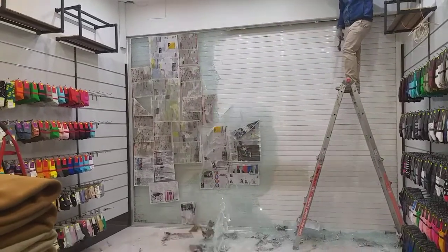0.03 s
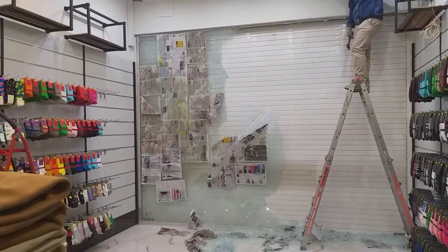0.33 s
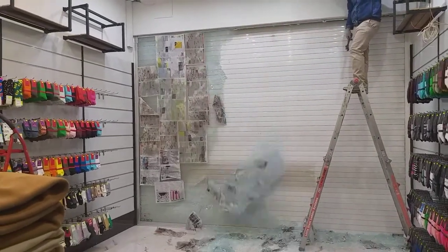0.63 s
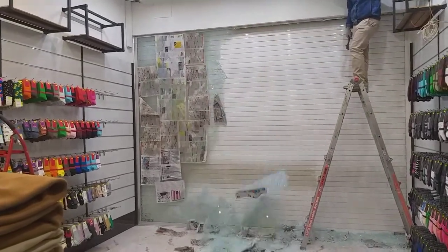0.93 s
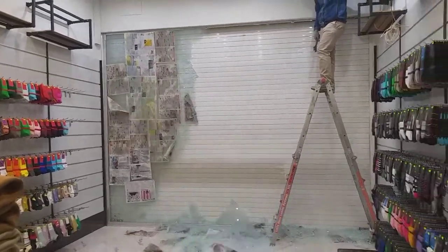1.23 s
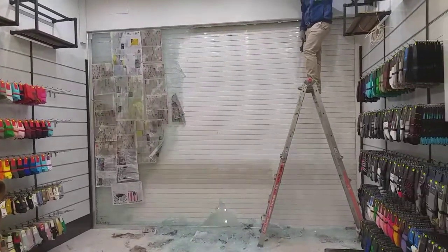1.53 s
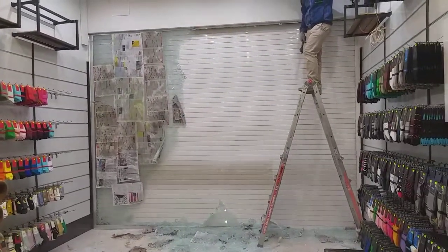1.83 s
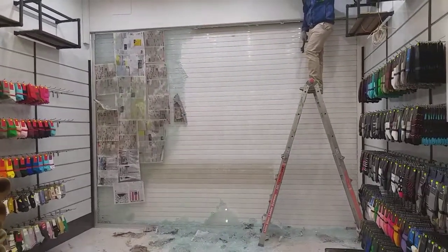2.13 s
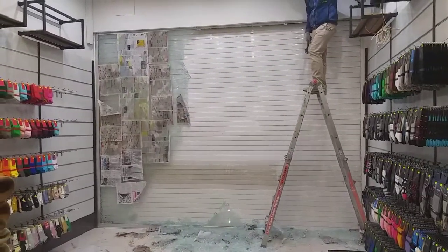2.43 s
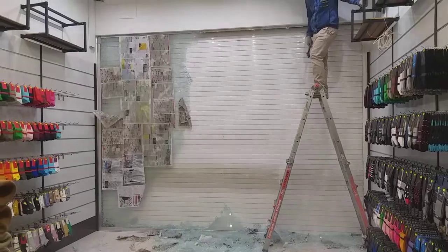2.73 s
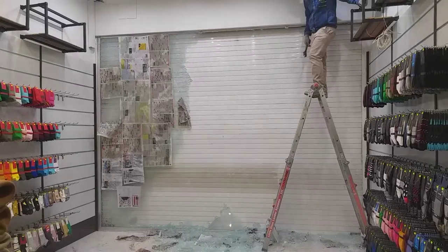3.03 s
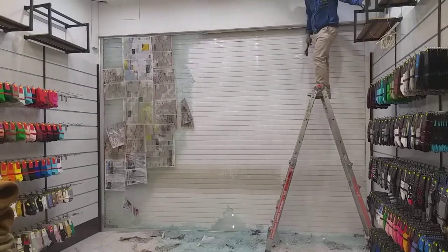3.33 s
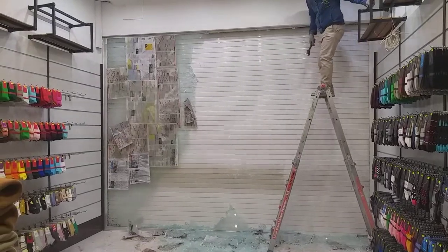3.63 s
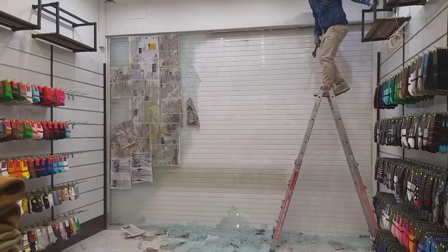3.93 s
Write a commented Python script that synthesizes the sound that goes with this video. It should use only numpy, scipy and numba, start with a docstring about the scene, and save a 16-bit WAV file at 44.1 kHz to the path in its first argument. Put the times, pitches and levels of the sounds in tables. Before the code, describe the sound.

A large glass pane collapses onto a hard shop floor a few metres away, with thuds and a dense shower of ringing fragments. The shower thins to single clinks, then the remaining glass crackles faintly in the slightly echoing room.

```python
"""A toughened glass pane collapses onto the hard floor of a small shop, a few metres away.
Slabs thud and burst into thousands of clicking, ringing crumbs; the shower thins and single pieces land.
Glass and paper slide down the frame with a swish. The crazed glass left in it crackles and drops
a few more bits. Each landing place has its own echoes; a low room rumble lies underneath."""
import sys
import numpy as np
from scipy import signal
from scipy.fft import rfft, irfft
from scipy.io import wavfile
from scipy.ndimage import uniform_filter1d
from numba import njit

SR = 44100
rng = np.random.default_rng(int(sys.argv[2]) if len(sys.argv) > 2 else 0)


def generate_wav(signal):
    """Clip the signal to [-1, 1] and save it as 16-bit WAV at the path in sys.argv[1]."""
    frames = np.transpose(np.atleast_2d(signal))
    scaled = np.clip(frames, -1, 1) * 32767
    pcm = np.round(scaled).astype(np.int16)
    wavfile.write(sys.argv[1], SR, pcm)


N = 4 * SR

BODY_HZ, RING_HZ, BRIGHT_HZ, SPLINTER_HZ, TOP_HZ = 514, 3240, 6300, 10000, 15900  # band edges of a hit
TAIL_DB, EARLY_DB = -11.5, -10


def undb(db):
    """Decibels to gain."""
    return 10 ** (np.asarray(db) / 20)


def unit(x):
    """Scale to rms 1."""
    return x / np.sqrt(np.mean(x ** 2) + 1e-20)


def even(x):
    """Hold the slow level of a stream at 1, leaving its grain."""
    return x / np.sqrt(np.abs(uniform_filter1d(x ** 2, size=2600)) + np.mean(x ** 2) / 1000)


def curve(rows, column=1):
    """One column of a table, interpolated linearly in time."""
    rows = np.array(rows)
    return np.interp(np.arange(N) / SR, rows[:, 0], rows[:, column])


def along(points, hz):
    """Read (Hz, value) points on a log-frequency axis."""
    points = np.array(points)
    return np.interp(np.log(hz + 1), np.log(points[:, 0]), points[:, 1])


def band(hz, low_hz, high_hz, order=6):
    """Band-pass gain; order sets the slope of the lower edge."""
    return ((1 + (low_hz / (hz + 1)) ** (2 * order)) * (1 + (hz / high_hz) ** 12)) ** -.5


def resonance(hz, centre_hz, width_hz):
    """Gain of one resonance, 1 at its centre."""
    return (1 + ((hz - centre_hz ** 2 / (hz + 1)) / width_hz) ** 2) ** -.5


def shape(x, gain, size=4096):
    """Minimum-phase filter with response gain(hz)."""
    cepstrum = irfft(np.log(gain(np.arange(size // 2 + 1) * SR / size) + 1e-5))
    cepstrum[1:size // 2] *= 2
    cepstrum[size // 2 + 1:] = 0
    return signal.fftconvolve(x, irfft(np.exp(rfft(cepstrum))))[:len(x)]


def equalise(x, points):
    """Filter by (Hz, dB) points."""
    return shape(x, lambda hz: undb(along(points, hz)))


def add(out, start_s, x):
    """Mix a sound in at its time."""
    i = int(start_s * SR)
    out[i:i + len(x)] += x[:N - i]


@njit
def ring(n, starts, sizes, hz, t60_s):
    """Each impact rings one decaying mode, with the energy of its click."""
    out = np.zeros(n)
    for k in range(len(starts)):
        fade = np.log(1000) / (t60_s[k] * SR)
        pole = np.exp(2j * np.pi * hz[k] / SR - fade)
        phasor = sizes[k] * 2 * np.sqrt(fade) + 0j
        for i in range(starts[k], min(n, starts[k] + int(t60_s[k] * SR))):
            phasor *= pole
            out[i] += phasor.imag
    return out


def impacts(per_s, force, low_hz=RING_HZ, high_hz=TOP_HZ, ring_share=0, t60_s=.026, spread_db=1.5):
    """Random impacts of very unequal size: clicks, with a share of ringing at each shard's own pitch."""
    n = len(force)
    chance, size, pitch, damping, sign = rng.random((5, n))
    at = np.flatnonzero(chance < per_s / SR)
    size_db = -spread_db * np.log(.016 + size[at])  # offset bounds the largest impacts
    clicks = np.zeros(n)
    clicks[at] = force[at] * np.sign(sign[at] - .5) * undb(size_db)
    pitch_hz = low_hz + (high_hz - low_hz) * pitch[at]
    rings = ring(n, at, clicks[at], pitch_hz, t60_s * 2 ** (3 * (damping[at] - .5)))
    return np.sqrt(1 - ring_share) * clicks + np.sqrt(ring_share) * rings


def rumble():
    """Low background noise of the building."""
    # Each row: frequency in Hz, relative density in dB.
    spectrum = [(25, 1.5), (60, 2), (130, 0), (200, -6.5), (350, -13.5), (800, -20.5), (2000, -28.5),
                (15000, -42)]
    # Each row: time in seconds, level in dB.
    levels = [(0, -46.5), (2.3, -73), (2.6, -68), (3.0, -60), (4.0, -59.5)]
    return unit(equalise(rng.standard_normal(N), spectrum)) * undb(curve(levels))


def room(x):
    """Sparse echoes off floor and shutter, then a diffuse tail that lasts longest in the midrange."""
    # Each row: frequency in Hz, reverberation t60 in seconds.
    decay = [(150, 0.16), (600, 0.79), (2000, 0.75), (6000, 0.4), (14000, 0.27)]
    t = np.arange(SR // 2) / SR
    noise = rfft(rng.standard_normal(len(t)))
    hz = np.arange(len(noise)) * SR / len(t)
    edges_hz = np.append(0, SR / 2 / 2. ** np.arange(7)[::-1])
    tail = np.zeros(len(t))
    for low_hz, high_hz in zip(edges_hz, edges_hz[1:]):
        octave = irfft(noise * (hz >= low_hz) * (hz < high_hz), len(t))
        tail += octave * undb(-60 * t / along(decay, (low_hz + high_hz) / 2))
    early = rng.standard_normal(len(t)) * (rng.random(len(t)) < 2000 / SR)
    early *= np.exp(-t / .014) * (t > .001)
    response = undb(TAIL_DB) * unit(tail * (t > .0039)) + undb(EARLY_DB) * unit(early)
    return signal.fftconvolve(x, response / np.sqrt(len(t)))[:N]


def scattered(x, places=8, hop_s=.004):
    """Glass lands all over the floor; each place has its own echoes."""
    hop = int(hop_s * SR)
    place = np.repeat(rng.integers(0, places, N // hop + 1), hop)[:N]
    shares = [np.abs(uniform_filter1d(1. * (place == k), hop)) for k in range(places)]
    return [room(x * np.sqrt(share)) for share in shares]


def width(x):
    """Left and right differ a little in two narrow ranges, and the treble widens briefly."""
    # Each row: frequency in Hz, side gain in dB.
    side_colour = [(100, -60.5), (1300, -57), (2000, -15.5), (2700, -58.5), (6000, -69.5), (8500, -31),
                   (10000, -15.5), (11500, -51), (16000, -60.5)]
    # Each row: centre and half length in seconds, low and high edge in Hz, gain in dB.
    widenings = [(0.845, 0.019, 7250, 16000, -4.5), (0.917, 0.015, 6300, 8230, -12.5)]
    t = np.arange(N) / SR
    side = equalise(x, side_colour)
    for centre_s, half_s, low_hz, high_hz, db in widenings:
        window = np.exp(-((t - centre_s) / half_s) ** 4)
        side += undb(db) * window * shape(x, lambda hz: band(hz, low_hz, high_hz))
    return side


def trickle():
    """Tiny crumbs slide and tick between the larger events."""
    # Each row: time in seconds, level in dB.
    levels = [(2.0, -79), (2.34, -50.5), (2.62, -60.5), (2.77, -53.5), (2.83, -63), (2.92, -43), (3.0, -49),
              (3.3, -51.5), (3.41, -54), (3.49, -46), (3.55, -53.5), (3.67, -47.5), (3.75, -55),
              (3.87, -51), (4.0, -59)]
    # Each row: frequency in Hz, relative gain in dB.
    colour = [(400, -26), (1000, -16), (2000, -17), (2700, -15), (3400, -2), (6000, 0), (8200, 6.5),
              (9900, -7.5), (12500, -4), (16000, -7)]
    grains = impacts(per_s=3000, force=np.ones(N), ring_share=.24, t60_s=.014)
    return even(equalise(grains, colour)) * undb(curve(levels))


def swish(width_hz=1200, upper_hz=14000):
    """Glass and paper slip down the frame: a bright resonance rises with speed, a fainter one above."""
    # Each row: time in seconds, level in dB, rub pitch in Hz.
    slide = [(2.26, -82, 5980), (2.36, -52, 7090), (2.45, -44.5, 8220), (2.55, -80, 8400)]
    slips = impacts(per_s=3000, force=np.ones(N))
    carrier = np.cos(2 * np.pi * np.cumsum(curve(slide, column=2)) / SR)
    rub = shape(slips, lambda hz: 1 / (1 + (hz / width_hz) ** 2)) * carrier
    upper = shape(slips, lambda hz: resonance(hz, upper_hz, 2 * width_hz) ** 2)
    return (even(rub) + undb(-9) * even(upper)) * undb(curve(slide))


def knocks(blur_hz=35):
    """A large piece knocks and rocks; chatter on the floor widens its low bending modes."""
    # Each row: start in seconds, level in dB.
    contacts = [(1.891, -45), (1.944, -53.5)]
    # Each row: frequency in Hz, relative level in dB, t60 in seconds.
    modes = [(506, -1, 0.29), (750, -6, .16), (976, -1, .25), (1520, -5, 0.23)]
    out, t = np.zeros(N), np.arange(SR // 2) / SR
    for start_s, db in contacts:
        for hz, mode_db, t60_s in modes:
            chatter = np.cumsum(rng.standard_normal(len(t))) * np.sqrt(2 * np.pi * blur_hz / SR)
            phase = 2 * np.pi * hz * t + uniform_filter1d(chatter, size=200)
            add(out, start_s, undb(db + mode_db - 60 * t / t60_s) * np.sin(phase))
    return out


def clinks(decay_s=.0015):
    """A shard lands on its edge: one very short crack, coloured by its size."""
    # Each row: start in seconds, level in dB, pitch in Hz.
    landings = [(1.641, -25, 4900), (1.766, -21, 6500), (1.793, -25, 4600), (1.856, -24.5, 6600),
                (1.869, -28, 8200), (1.906, -26.5, 3980), (1.943, -24, 6400), (2.157, -32, 8340),
                (3.569, -21, 7100)]
    out, t = np.zeros(N), np.arange(SR // 20) / SR
    fall = np.exp(-t / decay_s)
    for start_s, db, pitch_hz in landings:
        snap = fall * rng.standard_normal(len(t))
        crack = shape(snap, lambda hz: resonance(hz, pitch_hz, width_hz=1200))
        add(out, start_s, undb(db) * unit(crack) * np.sqrt(np.mean(fall ** 2)))
    return out


def pane(mode_hz=1846, width_hz=140):
    """Debris knocks on the falling sheet and keeps its resonance going."""
    # Each row: time in seconds, level in dB.
    levels = [(.27, -46), (.34, -25.5), (.42, -32), (.56, -26.5), (.8, -34.5), (1.2, -45.5), (1.7, -85)]
    strikes = impacts(per_s=500, force=np.ones(N))
    ringing = shape(strikes, lambda hz: 1 / (1 + (2 * (hz - mode_hz) / width_hz) ** 2))
    return unit(ringing) * undb(curve(levels))


def thuds(rise_s=.00086):
    """A slab lands flat on the floor: a short, low, damped swing."""
    # Each row: start in seconds, level in dB, pitch in Hz, t60 in seconds.
    slabs = [(0.304, -13, 305, 0.057), (0.405, -22, 273, 0.14), (.877, -19, 117, 0.059),
             (0.89, -10.5, 193, 0.03), (1.154, -26, 91.5, 0.14), (1.728, -33, 320, 0.037)]
    out, t = np.zeros(N), np.arange(SR // 3) / SR
    rise = 1 - np.exp(-t / rise_s)
    for start_s, db, hz, t60_s in slabs:
        add(out, start_s, undb(db - 60 * t / t60_s) * np.sin(2 * np.pi * hz * t) * rise)
    return out


def burst(crumble_s, bands, snap_s=.00032, rise_s=.00033):
    """A snap, then dying grit; bands are (low Hz, high Hz, dB), the lowest sloping gently into the bass."""
    def gain(hz):
        """Power sum of the bands, each level spread over its width."""
        power = 0
        for k, (low_hz, high_hz, db) in enumerate(bands):
            passed = undb(db) * band(hz, low_hz, high_hz, order=6 if k else 3)
            power += passed ** 2 * SR / 2 / (high_hz - low_hz)
        return np.sqrt(power)

    t = np.arange(SR // 4) / SR
    fall = np.exp(-t / crumble_s)
    grit = impacts(per_s=3000, force=fall, low_hz=BODY_HZ, ring_share=.43, spread_db=2.5)
    grit = unit(grit) * np.sqrt(np.mean(fall ** 2))
    snap = undb(2.5) * np.exp(-t / snap_s) * rng.standard_normal(len(t))
    return shape((grit + snap) * (1 - np.exp(-t / rise_s)), gain)


def fragments():
    """Pieces burst on the floor with some body; cracks in the hanging glass are thin and bright."""
    # Each row: start in seconds, level in dB, body and splinters in relative dB,
    # crumbling time in seconds, low edge in Hz.
    pieces = [(.295, -12.5, -6, -6, 0.032, 2000), (.322, -14.5, -1, -18, 0.03, 2000),
              (0.412, -9.5, -24, -20, 0.03, 2000), (0.677, -21, -11, 9.5, 0.0042, 1500),
              (.712, -18.5, -11, -14, 0.052, 905), (1.158, -15, -17, 4, 0.024, 1500),
              (1.35, -14, -10, -4, 0.0066, 1190), (1.457, -19, -32, -2, 0.019, 1200),
              (1.724, -37, -17, -10, 0.0068, 400), (1.893, -37, 7, -9, 0.006, 500),
              (1.944, -29.5, -5, -6, 0.008, 498), (1.969, -33.5, -12, -3, 0.0093, 508),
              (2.046, -40.5, -3, -13, .01, 910), (2.07, -37, -18, -21, 0.0093, 905),
              (2.166, -43.5, -17, -8, 0.031, 1500), (2.457, -55, 4.5, -6.5, 0.0025, 900),
              (2.655, -54.5, -5, -6, 0.042, 1590), (3.553, -42, -18, -4, .007, 2200),
              (3.563, -30.5, -13, -11, 0.0084, 2030), (3.574, -36, -1.5, -11, 0.039, 1970),
              (3.766, -52, 2.5, -2, 0.068, 750), (3.827, -37, -22, -10, 0.015, 1100)]
    # Each row: start in seconds, level in dB, lower ring and splinters in relative dB,
    # crumbling time in seconds.
    cracks = [(2.569, -49.5, -6, 6, 0.004), (2.644, -32, -14, -16, 0.0031),
              (2.651, -36.5, -12.5, -18, 0.0076), (2.669, -49, -8, 6, .012), (2.731, -55, -10, 12, .01),
              (2.852, -51.5, -15.5, -7, 0.025), (2.921, -31, -20, 0, .001), (2.929, -24, -15, 9.5, 0.001),
              (2.935, -29.5, -13, 1, 0.004), (2.968, -35.5, -3, -6, 0.0059), (2.977, -40.5, -3, -8, 0.023),
              (3.028, -39, -7, -3, 0.019), (3.116, -37.5, -19, 1, 0.021), (3.187, -45, -8, -3, 0.012),
              (3.198, -43, -20, 4, 0.0066), (3.238, -34.5, -13, -5, 0.0018), (3.267, -43, -4, 14.5, 0.0019),
              (3.329, -33, -11, -6, 0.0028), (3.341, -40, -4, -10, 0.012), (3.426, -42.5, -8, 8, 0.001),
              (3.433, -41.5, -2, 6.5, 0.013), (3.720, -38.5, -9, -14, 0.0082), (3.762, -42, 0, 15, 0.002),
              (3.965, -43.5, -14, -8, .004)]
    # Colour of all these hits at the microphone. Each row: frequency in Hz, gain in dB.
    colour = [(500, 0), (1300, -1), (2000, -3), (2700, -4.5), (3600, 1), (5200, -1.5), (8000, 5),
              (8900, -3.5), (9900, -16), (11500, 2.5), (13000, 2.5), (16000, -7.5)]
    out = np.zeros(N)
    for start_s, db, body_db, splinter_db, crumble_s, low_hz in pieces:
        bands = [(low_hz, RING_HZ, body_db), (RING_HZ, SPLINTER_HZ, 0),
                 (SPLINTER_HZ, TOP_HZ, splinter_db)]
        add(out, start_s, undb(db) * burst(crumble_s, bands))
    for start_s, db, ring_db, splinter_db, crumble_s in cracks:
        bands = [(2 * BODY_HZ, RING_HZ, -29), (RING_HZ, BRIGHT_HZ, ring_db),
                 (BRIGHT_HZ, SPLINTER_HZ, 0), (SPLINTER_HZ, TOP_HZ, splinter_db)]
        add(out, start_s, undb(db) * burst(crumble_s, bands))
    return equalise(out, colour)


def shower(thinning=.6):
    """Four kinds of debris and the floor click and ring; the weaker the flow, the fewer the impacts."""
    # Each row: time in seconds, then level in dB of crumbs, shards, chunks, splinters, floor.
    flows = [(0.0, -9.5, -14.5, -21.5, -14.5, -39.5), (0.09, -13, -16.5, -22.5, -17.5, -32.5),
             (0.26, -14.5, -17, -24.5, -18.5, -37.5), (0.31, -13, -14, -22, -24, -28),
             (0.33, -15.5, -13.5, -20.5, -23, -34.5), (0.53, -13.5, -14, -23.5, -21.5, -32.5),
             (0.65, -19.5, -19, -27.5, -26, -44), (0.7, -19.5, -21.5, -24.5, -21.5, -39),
             (0.74, -14.5, -15.5, -27.5, -19, -36.5), (0.85, -14, -15.5, -24.5, -15.5, -32),
             (0.89, -12, -15, -21.5, -14.5, -27), (0.93, -13, -14.5, -21.5, -18.5, -34),
             (1.07, -12, -16, -22.5, -20, -33.5), (1.2, -13.5, -16.5, -24, -16, -34),
             (1.3, -19.5, -25, -32, -25, -43.5), (1.43, -24.5, -26.5, -37, -29, -41),
             (1.47, -23, -28.5, -35, -24.5, -45), (1.6, -36, -38, -41.5, -41.5, -50.5),
             (1.65, -27, -29, -35, -34.5, -54), (1.71, -39.5, -40, -46, -46.5, -61.5),
             (1.73, -32.5, -36, -44, -43.5, -47.5), (1.85, -40.5, -42.5, -50.5, -46.5, -66),
             (1.94, -43.5, -45, -49, -49.5, -66), (2.21, -53, -58, -73.5, -63.5, -95),
             (2.27, -69.5, -69, -82, -72, -85.5)]
    # Each row: frequency in Hz, relative density in dB.
    spectrum = [(30, -31), (60, -23.5), (100, -19), (180, -9.5), (290, -7), (430, -6.5), (700, -3),
                (1100, -4), (1900, -0.5), (2450, -1), (3000, 2), (4000, 1.5), (5300, 0), (7000, 2),
                (8200, 3), (9900, -15), (12300, -6.5), (14800, -12.5), (16000, -18)]
    # Each kind: low and high edge in Hz, trim in dB, impacts per second at full flow,
    # ringing share 0-1, median t60 in seconds (sign ignored).
    crumbs = (5510.5, 9817.5, -1, 7003.5, 0.24, 0.56)
    shards = (2603.5, 5494.5, 0, 4502, 0.33, -0.12)
    chunks = (390, 2619, 1, 2501, 0.37, 0.5)
    splinters = (9812.5, 16498.5, 1.8, 5300, 0.17, 0.9)
    floor = (34, 394, -0.5, 491, 0.5, 1.5)
    out, force = np.zeros(N), np.ones(N)
    for column, kind in enumerate([crumbs, shards, chunks, splinters, floor], start=1):
        low_hz, high_hz, trim_db, full_per_s, ring_share, t60_s = kind
        flow = undb(curve(flows, column))
        per_s = full_per_s * (flow / flow.max()) ** thinning
        colour = lambda hz: band(hz, low_hz, high_hz) * undb(along(spectrum, hz))
        for ringing, share in ((0, 1 - ring_share), (1, ring_share)):  # clicks, then rings
            hits = impacts(per_s, force, low_hz, high_hz, ringing, abs(t60_s), spread_db=2.5)
            out += undb(trim_db) * flow * np.sqrt(share) * even(shape(hits, colour))
    return out


def scene():
    """Glass and its echoes over the rumble, nearly mono."""
    loose = shower() + pane() + fragments() + clinks() + swish() + trickle()
    slabs = thuds() + knocks()
    echoes = scattered(loose)
    echo_power = undb(TAIL_DB) ** 2 + undb(EARLY_DB) ** 2
    mid = (loose + sum(echoes) + slabs + room(slabs)) / np.sqrt(1 + echo_power) + rumble()
    side = width(sum(echoes[::2]) - sum(echoes[1::2])) / np.sqrt(echo_power)
    return np.array([mid + side, mid - side])


def record(dry):
    """The recorder rounds the loudest peaks, drops the deepest bass and cuts the top."""
    ceiling, bass_cut_hz = .92, 65
    rounded = ceiling * np.tanh(dry / ceiling)
    high_passed = signal.sosfilt(signal.butter(2, bass_cut_hz, "high", fs=SR, output="sos"), rounded)
    return signal.sosfilt(signal.ellip(10, .2, 80, TOP_HZ, fs=SR, output="sos"), high_passed)


dry = scene()
out = record(dry)
generate_wav(out)
```